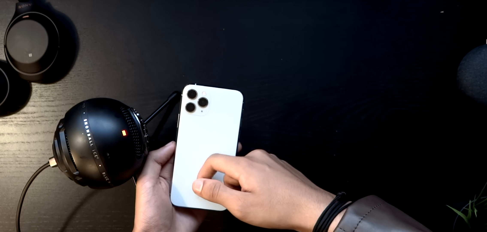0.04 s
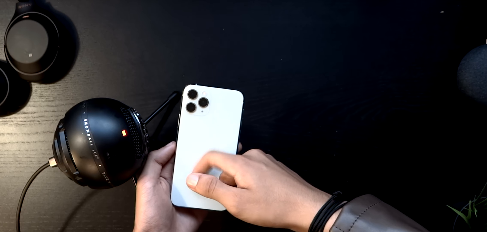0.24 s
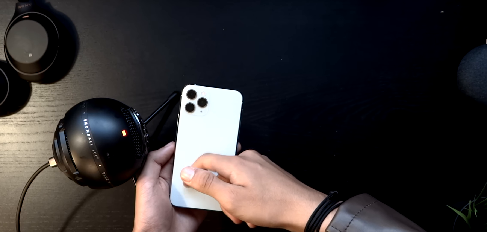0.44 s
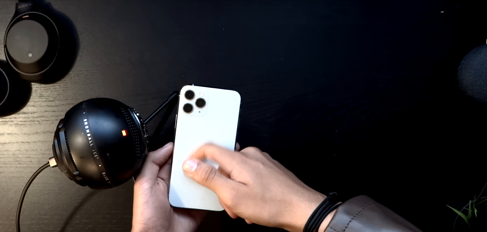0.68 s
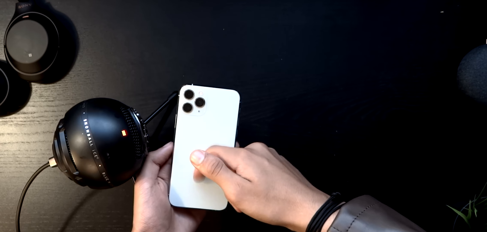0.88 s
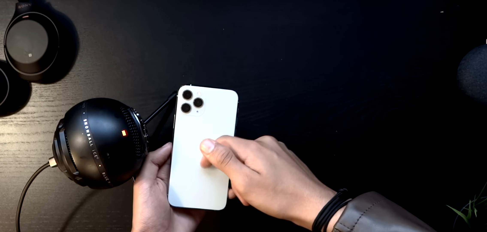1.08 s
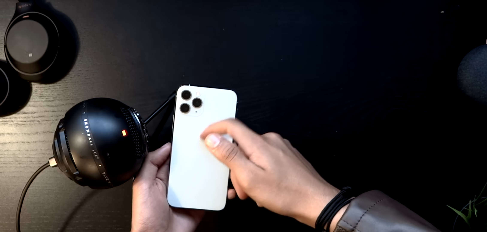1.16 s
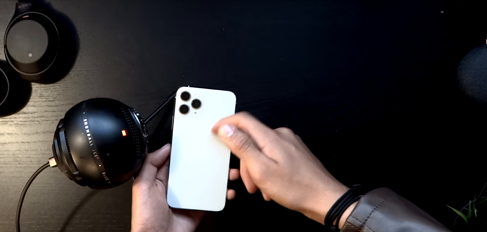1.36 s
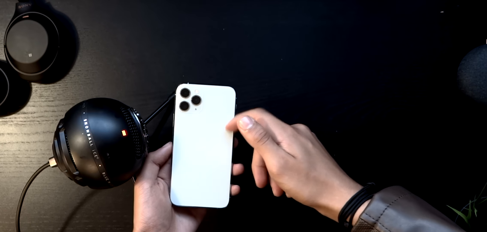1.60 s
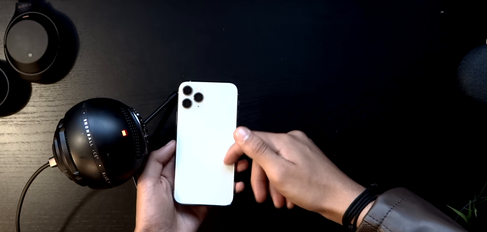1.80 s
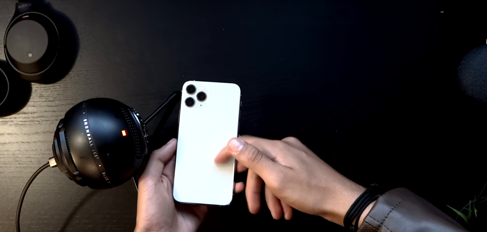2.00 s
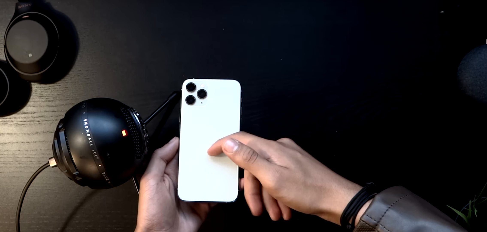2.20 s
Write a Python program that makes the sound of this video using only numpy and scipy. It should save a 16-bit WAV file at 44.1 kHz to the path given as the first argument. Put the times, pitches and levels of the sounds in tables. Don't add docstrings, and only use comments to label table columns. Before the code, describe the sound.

Brisk, airy skin-on-glass rubbing in short strokes, with nail ticks and two soft knocks of the case

```python
import sys
import numpy as np
from scipy import signal
from scipy.fft import rfft, irfft
from scipy.io import wavfile
from scipy.ndimage import uniform_filter1d

SR = 44100
rng = np.random.default_rng(int(sys.argv[2]) if len(sys.argv) > 2 else 0)


def invert_db(x):
    u = np.asarray(x, float) / 20
    return 10 ** u


def pcm_store(signal):
    levels = np.round(np.clip(np.atleast_2d(signal), -1, 1) * 32767)
    wavfile.write(sys.argv[1], SR, levels.astype(np.int16).T)


N = 99225

# touch in seconds, lift in seconds, level at touch in dB, level at lift in dB,
# dull hollow against bright glass in dB.
SLIDES = [(-.02, .075, -53, -58, -3), (.09, .156, -60, -56, -5), (.192, .285, -63, -66, -4),
          (.303, .39, -54, -60, -6), (.402, .505, -59, -63, -6), (.525, .6, -56, -58, -7),
          (.61, .69, -60, -64, -6), (.72, .792, -60, -57.5, -4), (.805, .898, -59, -62, -7),
          (.925, .981, -60, -52, -12), (1.0, 1.112, -60, -58, -4), (1.135, 1.184, -56, -50, -3),
          (1.249, 1.345, -53, -62, -2), (1.35, 1.381, -54, -48, -1), (1.398, 1.406, -39, -41, -11),
          (1.432, 1.4605, -58, -52, -9), (1.485, 1.488, -49, -52, -3), (1.4935, 1.56, -53, -62, -7),
          (1.58, 1.638, -58, -56, -1), (1.652, 1.778, -52, -63, -7), (1.79, 1.872, -63, -61, -6),
          (1.885, 1.99, -62, -65, -9), (2.01, 2.2, -62, -70, -5), (2.22, 2.3, -65, -45, -9)]
# time in seconds, level in dB, seconds to lose 10 dB,
# dull hollow against bright glass in dB.
SURGES = [(.108, -52, .014, -9), (.238, -43, .02, -16), (.313, -57, .008, 5), (.33, -45, .014, -13),
          (.457, -42, .02, -15), (.55, -48, .016, -10), (.64, -50, .02, -10), (.651, -40, .008, -16),
          (.748, -53, .02, -5), (.782, -60, .01, 4), (.848, -52, .02, -7), (.953, -53, .015, -10),
          (1.05, -40.5, .016, -13), (1.075, -60, .02, 4), (1.153, -52, .01, 4), (1.179, -40, .011, -14),
          (1.257, -45, .024, -16), (1.61, -50, .025, -2), (1.672, -53, .018, 0), (1.693, -45.5, .017, -11),
          (1.855, -54, .025, -1.2), (2.08, -51, .033, -4)]
# time in seconds, pitch in Hz.
HOLLOW_HZ = [(0, 4500), (.76, 4700), (.785, 3800), (.82, 4600), (1.1, 4700), (1.4, 5100), (1.6, 5600),
             (1.75, 5600), (1.85, 4900), (2.0, 5400), (2.25, 5500)]
# centre in Hz, width in Hz, level in dB.
GLASS = [
    (8050, 1500, -.5),
    (10400, 2000, 0),
    (12800, 2000, .7),
    (15000, 2600, -3),
]
# time in seconds, centre in Hz.
SHINE_HZ = [(0, 12800), (1.55, 12800), (1.59, 13900), (1.63, 13000), (1.66, 11700), (1.76, 11900),
            (1.85, 12800), (2.25, 12800)]
# time in seconds, change in dB.
CUP_DB = [(0, 0), (1.5, 0), (1.58, -2.5), (1.78, -3), (1.85, -1.5), (2.25, -2.5)]
# time in seconds, level in dB.
GAP_DB = [(0, -14), (1.1, -13), (1.45, -9), (1.56, -17), (2.25, -15)]
# middle in seconds, level in dB, pitch in Hz.
THUMPS = [(.086, -39, 42), (.193, -43, 55), (.299, -38, 48), (.523, -40, 70), (.604, -42, 40),
          (.632, -42, 35), (.797, -48, 60), (.913, -42, 50), (1.05, -36, 29), (1.097, -21.5, 19),
          (1.139, -32, 45), (1.168, -23, 26), (1.2515, -37, 70), (1.545, -40, 50), (2.0, -42, 45),
          (2.055, -44, 50)]
# time in seconds, level in dB.
ARM = [(0.0, -42), (0.15, -48), (0.24, -34), (0.42, -34), (0.49, -46), (0.62, -32), (0.74, -38),
       (0.83, -32), (0.93, -40), (1.04, -29), (1.2, -40), (1.52, -40), (1.6, -46), (2.02, -42), (2.06, -53),
       (2.19, -43), (2.25, -48)]
SWINGS = [-.033, .1, .18, .265, .355, .48, .575, .7, .78, .89, .97, 1.08, 2.3]
# time in seconds, level in dB.
DESK = [(0.0, -70), (0.05, -52), (0.39, -56), (0.58, -42), (0.68, -62), (0.75, -47), (0.85, -51),
        (1.21, -28), (1.33, -34), (1.52, -28), (1.61, -37), (1.89, -34), (2.01, -50), (2.18, -41),
        (2.25, -48)]
# time in seconds, pitch in Hz.
DESK_HZ = [(0, 17), (1.0, 22), (1.2, 21), (2.25, 21)]
# pitch in Hz, level in dB.
ROOM = [(30, -7), (110, -22.5), (250, -23.5), (380, -31), (570, -36.5), (1050, -29), (2000, -41),
        (3500, -45.5), (14000, -50)]
# time in seconds, peak in dB, pitch of the case body in Hz, crack against body in dB.
TICKS = [
    (.1908, -35.5, 1450, -2),
    (1.1365, -42, 1150, -10),
    (1.2484, -26.5, 1060, -1.5),
    (1.381, -48, 850, -8),
    (1.398, -49, 900, 10),
    (1.432, -33.5, 1100, -2),
    (1.485, -57, 1000, 15),
    (1.4935, -59, 1000, 14),
    (1.556, -43, 1800, -5),
]
# time in seconds, level in dB, end of the case (0 near, 1 far).
KNOCKS = [
    (1.1375, -33.5, 0),
    (1.145, -43, 0),
    (1.1765, -50, 0),
    (1.5575, -37, 1),
    (1.5655, -47, 1),
    (1.5805, -48, 0),
]
# pitch in Hz, level in dB, seconds to fall 60 dB.
NEAR = [(200, -2, .06), (268, -3.5, .14), (420, -13, .06), (662, -9.5, .08)]
# pitch in Hz, level in dB, seconds to fall 60 dB.
FAR = [(205, -4, .07), (255, 1.5, .08), (412, -.7, .065), (675, -9, .06)]

TOUCH_S, LIFT_S, SNAP_S = .011, .007, .0013
LEAN = 1.05
CATCH_PER_S, CATCH_SPREAD_DB = 26000, 1.2
PATCHY_DB, FLICKER_DB = 2.1, .6
THUMP_CYCLES = .42
LATE_SWINGS = 11
JUMP_S, SLIP_S = .00012, .007
REBOUND_TURNS, REBOUND_WIDTH = .72, .23
REBOUND_DB, ECHO_DB = .3, -11
CRACK_T60 = .002
GRIP_SAG, GRIP_S = .12, .008


def evened(x):
    return x / np.sqrt(np.mean(x ** 2) + 1e-20)


def along(points):
    s, value = np.transpose(points)
    return np.interp(np.arange(N) / SR, s, value)


def add(mix, s, sound):
    part = mix[round(s * SR):][:len(sound)]
    part += sound[:len(part)]


def resonate(x, hz, width_hz):
    turn = np.exp(2j * np.pi * np.cumsum(hz * np.ones(len(x))) / SR)
    r = np.exp(-np.pi * width_hz / SR)
    smooth = signal.lfilter([(1 - r) ** 2], [1, -2 * r, r * r], x / turn)
    return 2 * (turn * smooth).real


def wander(span_s):
    knots = np.arange(0, N / SR + 4 * span_s, span_s / 3)
    draw = rng.standard_normal(len(knots))
    soft = uniform_filter1d(uniform_filter1d(draw, size=3), size=3)
    return evened(np.interp(np.arange(N) / SR, knots, soft))


def pressure():
    out = np.zeros((2, N))
    for touch, lift, in_db, out_db, dull_db in SLIDES:
        at = slice(max(round((touch - TOUCH_S) * SR), 0), min(round((lift + LIFT_S) * SR), N))
        t = np.arange(at.start, at.stop) / SR
        lands_with_tick = min(abs(touch - tick[0]) for tick in TICKS) < .003
        flicked_off = out_db > in_db + 3 or lift - touch < .015
        rise = SNAP_S if lands_with_tick else TOUCH_S
        fade = SNAP_S if flicked_off else LIFT_S
        on = np.clip(np.minimum((t - touch) / rise, (lift - t) / fade) + .5, 0, 1)
        power = invert_db(2 * np.interp(t, [touch, lift], [in_db, out_db])) * invert_db([[0], [2 * dull_db]])
        for top, db, fall, surge_dull_db in SURGES:
            if touch < top < lift:
                away = np.where(t > top, (t - top) / LEAN, (top - t) * LEAN) / fall
                power = power + invert_db(2 * db - 20 * away ** 1.3) * invert_db([[0], [2 * surge_dull_db]])
        out[:, at] += on ** 2 * power
    return np.sqrt(out)


def rubbing():
    caught = rng.random(N) < CATCH_PER_S / SR
    spread = invert_db(CATCH_SPREAD_DB * np.minimum(rng.exponential(1, N), 4))
    catch = caught * rng.standard_normal(N) * spread
    catch = evened(catch * invert_db(FLICKER_DB * wander(.0015)))
    other_catch = catch[::-1]

    low, middle, shine, air = GLASS
    middle = (*middle[:2], middle[2] + along(CUP_DB))
    shine = (along(SHINE_HZ), *shine[1:])
    glass = np.zeros(N)
    for k, (hz, width_hz, db) in enumerate([low, middle, shine, air]):
        level = invert_db(db + PATCHY_DB * wander(.03))
        band = evened(resonate(catch, hz * (1 + .03 * wander(.05)), width_hz))
        glass += (-1) ** k * level * band
    glass = evened(glass)
    gap = evened(resonate(other_catch, 6400, 1500))
    glass = glass + invert_db(along(GAP_DB) + .8 * wander(.03)) * gap

    hollow = evened(resonate(catch, along(HOLLOW_HZ) * (1 + .04 * wander(.04)), 1700))
    skirt = evened(resonate(other_catch, 3000, 2600))
    hollow = hollow + invert_db(-13.5) * skirt
    bright, dull = pressure()
    return bright * glass + dull * hollow * invert_db(.9 * wander(.02))


def desk():
    out = np.zeros(N)
    t = np.arange(-SR // 16, SR // 16) / SR
    for s, db, hz in THUMPS:
        swell = np.exp(-(t * hz / THUMP_CYCLES) ** 2)
        add(out, s + t[0], -invert_db(db) * swell * np.sin(2 * np.pi * hz * t + .9))

    turns = np.arange(len(SWINGS))
    turns[-1] += LATE_SWINGS - 1
    arm_turns = uniform_filter1d(along(np.transpose([SWINGS, turns])), size=1500, mode="nearest")
    arm = invert_db(along(ARM)) * np.cos(2 * np.pi * arm_turns)
    sway_turns = np.cumsum(along(DESK_HZ)) / SR + .3
    sway = invert_db(along(DESK)) * np.sin(2 * np.pi * sway_turns)
    return out + np.sqrt(2) * (arm + sway)


def room():
    hz = np.fft.rfftfreq(N, 1 / SR)
    f, db = np.transpose(ROOM)
    colour = invert_db(np.interp(np.log(hz + 1), np.log(f), db)) * (hz > 24)
    tone = irfft(rfft(rng.standard_normal(N)) * colour, N)
    return invert_db(-53 + 1.1 * wander(.04)) * evened(tone)


def ticks():
    out = np.zeros(N)
    t = np.arange(1800) / SR
    for s, db, hz, crack_db in TICKS:
        rebound = np.zeros(len(t))
        for k, up_db in enumerate([REBOUND_DB, ECHO_DB]):
            rebound += invert_db(up_db) * np.exp(-((hz * t - k - REBOUND_TURNS) / REBOUND_WIDTH) ** 2)
        slip = (1 - np.exp(-t / JUMP_S)) * np.exp(-t / SLIP_S)
        grit = rng.standard_normal(len(t))
        grit = (grit - .6 * np.roll(grit, 1) - 1.5 * (t == 0)) / np.sqrt(2)
        crack = invert_db(crack_db - 60 * t / CRACK_T60) * grit
        add(out, s, invert_db(db) * (rebound - slip + crack))
    return out


def knocks():
    out = np.zeros(N)
    t = np.arange(SR // 3) / SR
    bent = t - GRIP_SAG * GRIP_S * (1 - np.exp(-t / GRIP_S))
    for s, db, far in KNOCKS:
        ring = np.zeros(len(t))
        for hz, mode_db, t60 in (FAR if far > .5 else NEAR):
            ring += invert_db(mode_db - 60 * t / t60) * np.sin(2 * np.pi * hz * bent)
        add(out, s, -invert_db(db) * np.minimum(t / .0015, 1) * ring)
    return out


def scene():
    return (rubbing() + desk() + room() + ticks() + knocks())[None]


def low_pass(x):
    return signal.sosfilt(signal.butter(12, 16650, fs=SR, output="sos"), x)


def record(dry):
    edge = signal.firwin(511, 15750, window=("kaiser", 7), fs=SR)
    narrow = signal.oaconvolve(dry, edge[None], "same")
    leak = invert_db(-27) * (dry - narrow)
    return low_pass(narrow + leak)


dry = scene()
out = record(dry)
pcm_store(out)
```